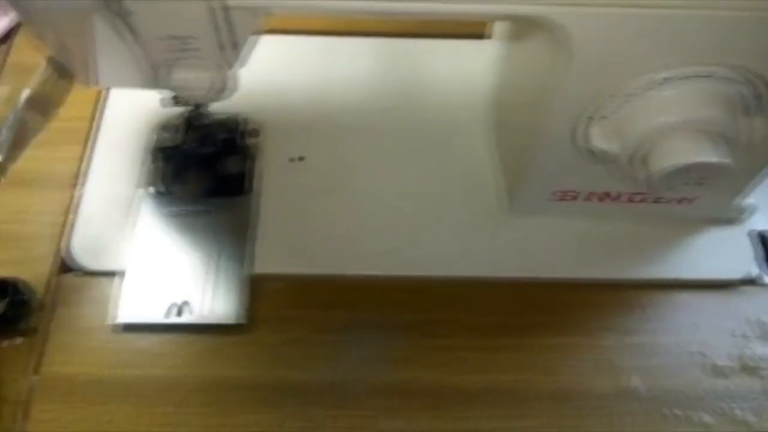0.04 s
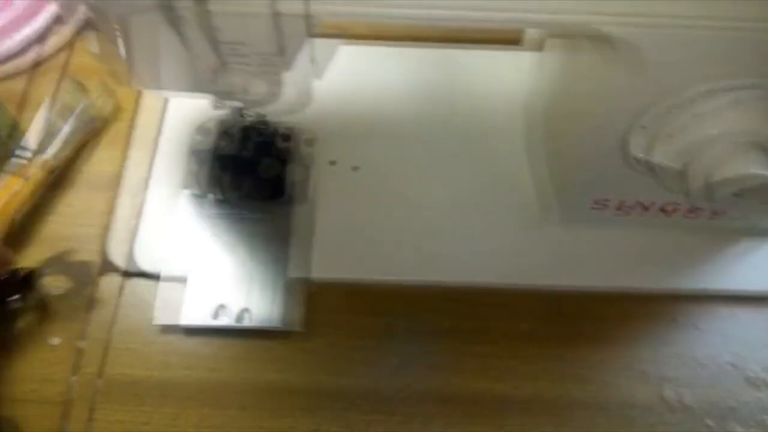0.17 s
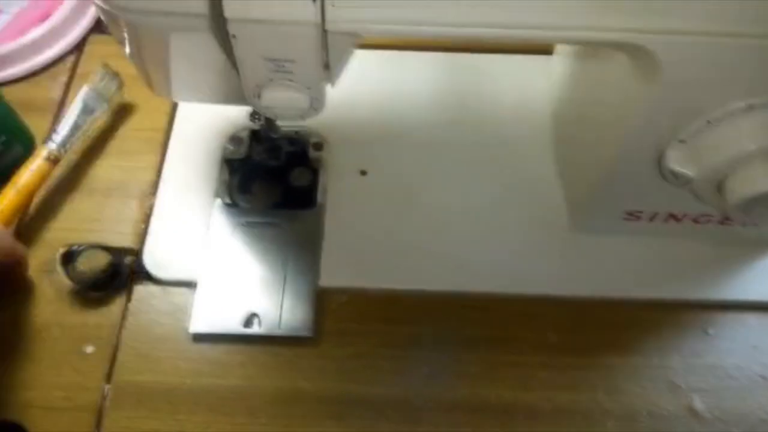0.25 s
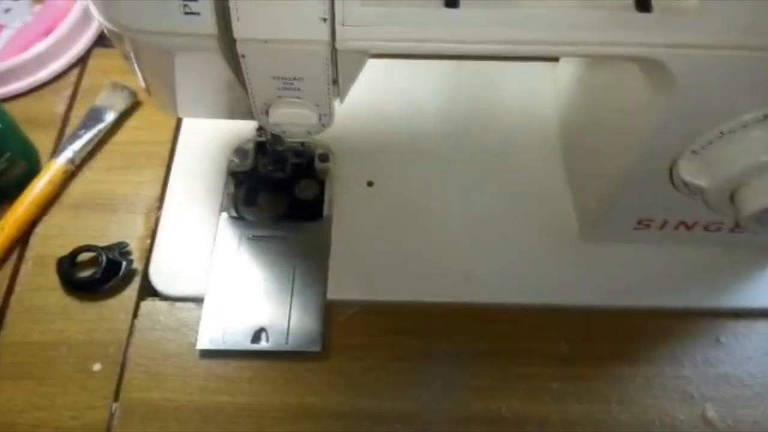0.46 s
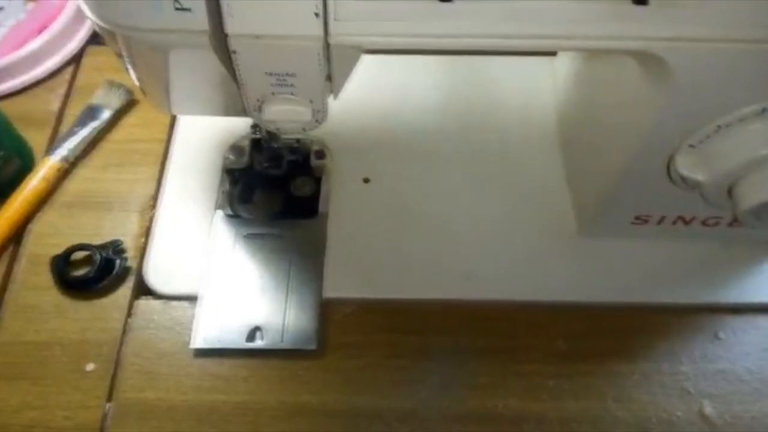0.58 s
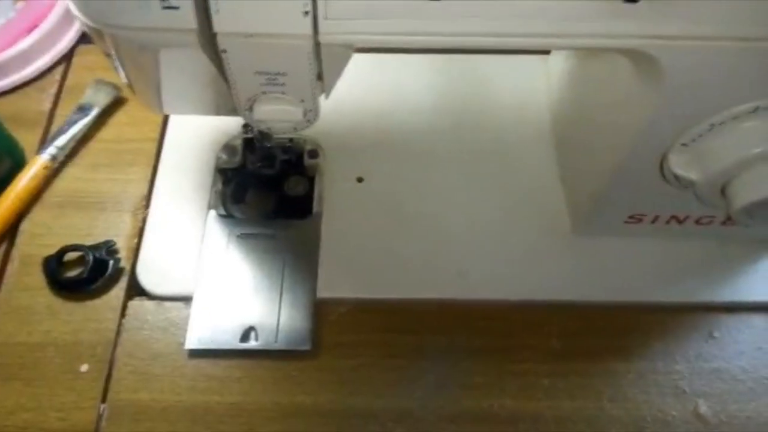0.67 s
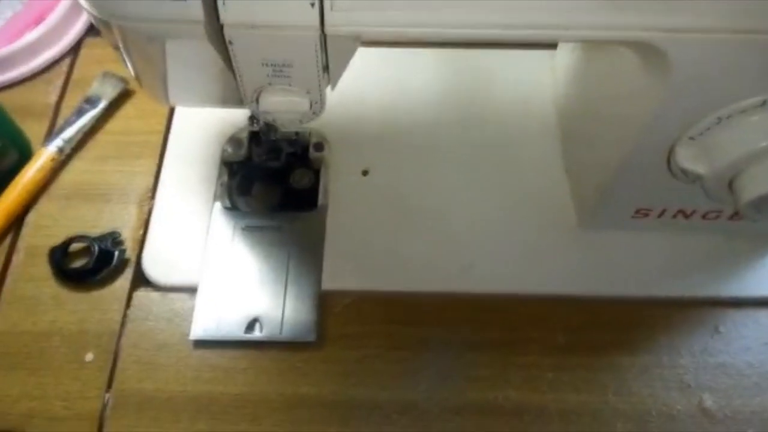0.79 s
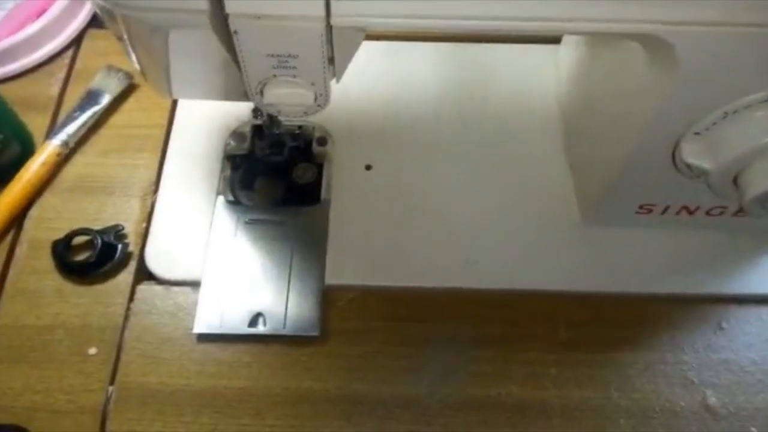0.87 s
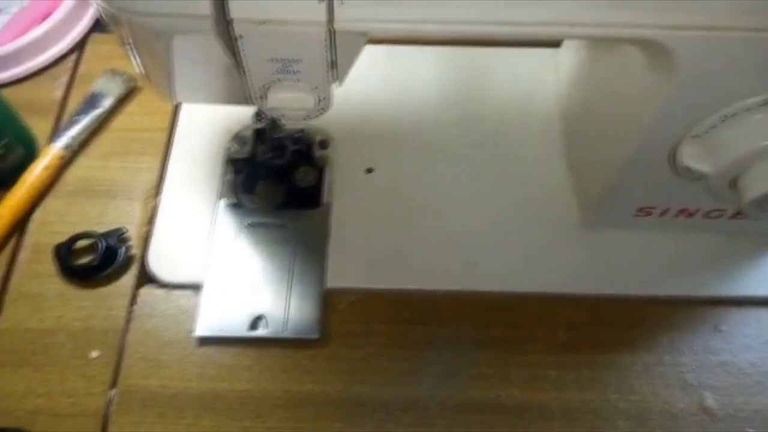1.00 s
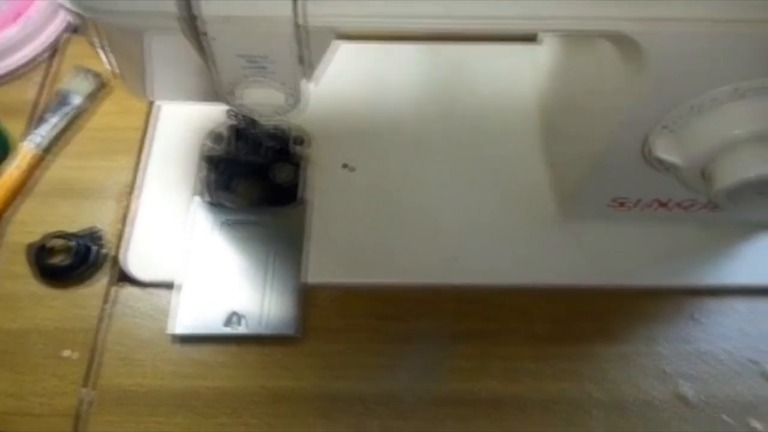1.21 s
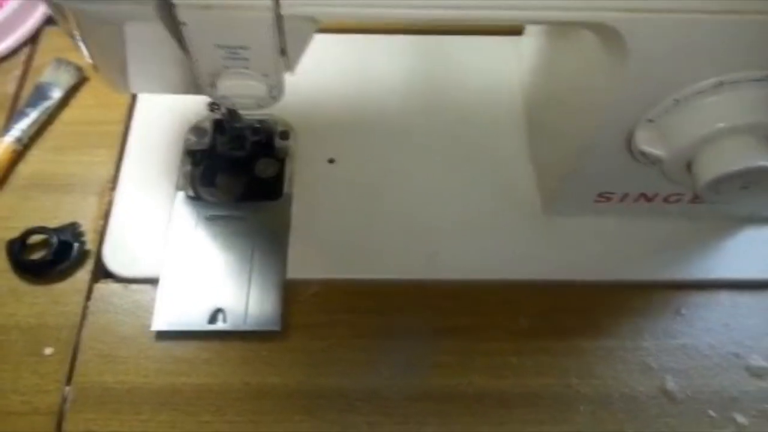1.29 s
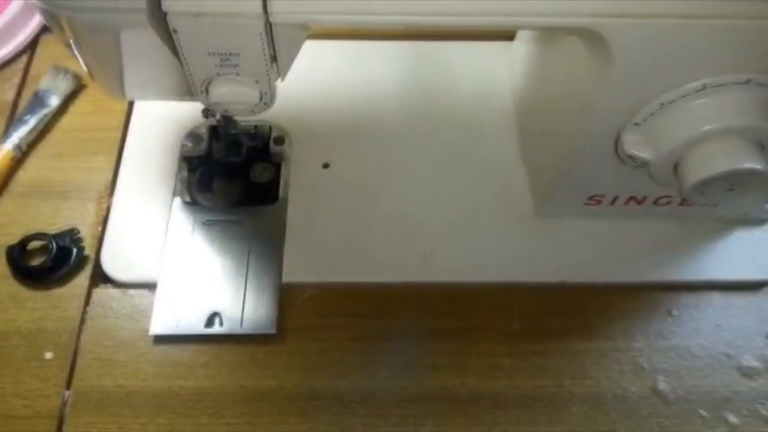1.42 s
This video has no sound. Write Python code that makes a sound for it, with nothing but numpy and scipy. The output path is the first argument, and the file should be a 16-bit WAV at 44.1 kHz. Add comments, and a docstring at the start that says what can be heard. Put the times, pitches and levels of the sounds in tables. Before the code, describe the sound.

A small wooden brush knocks once against a metal sewing machine, then its metal band clicks and scrapes briefly across it. After a pause, a small loose part rattles lightly to rest in a bare, slightly ringing room.

```python
"""A small wooden brush strikes a metal sewing machine: its handle knocks once, then its ferrule clicks
against the metal and scrapes briefly across it. Impacts and stick-slip friction excite the resonances
of brush and machine; damped modes of the table add soft thumps. Then a small loose part rattles to rest.
A bare, ringing room prolongs the contacts as a diffuse field; faint room noise lies underneath."""
import sys
import numpy as np
from scipy import signal
from scipy.fft import rfft, irfft, next_fast_len
from scipy.io import wavfile

SR = 44100
rng = np.random.default_rng(int(sys.argv[2]) if len(sys.argv) > 2 else 0)


def materialize(psi):
    """Save the field psi as 16-bit PCM at rate SR to the path in sys.argv[1].

    A 1-D psi becomes a single channel; in a 2-D psi each row is a channel.
    """
    bounded = np.clip(np.atleast_2d(psi).T, -1, 1)
    quanta = np.round(bounded * 32767).astype(np.int16)
    wavfile.write(sys.argv[1], SR, quanta)


N = 63945
T = np.arange(N) / SR

# spectrum of the bright metal shell: f/Hz, relative level/dB
SHELL_SPECTRUM = [(500, -37), (1450, -17), (1750, -3), (2050, -3), (2350, -10.5), (2800, -6), (3600, -4),
                  (4300, 4.5), (4870, 1), (5500, 6), (6050, 3.5), (6600, -10), (7300, -19.5), (8500, -37.5),
                  (11000, -33), (13500, -50)]
# narrow resonances of the metal, and its highest ping: f/Hz, bandwidth/Hz, level/dB
METAL_RESONANCES = [(4830, 200, -10.5), (5310, 430, 2), (5770, 200, -7), (5995, 280, -4),
                    (6690, 420, -16.5)]
PING_RESONANCE = [(15000, 520, 0.00078)]
# left-right coherence of the direct and of the diffuse field: f/Hz, correlation
DIRECT_COHERENCE = [(100, -0.055), (700, 0.85), (1200, -.2), (2500, -.1), (5000, -0.15), (15000, 0.34)]
DIFFUSE_COHERENCE = [(60, 0.98), (300, .8), (700, .6), (1100, -.25), (2200, 0.11), (5000, -0.65),
                     (15000, -0.18)]


def from_db(db):
    """Amplitude ratio: a factor of ten for every 20 dB."""
    return 10 ** (np.asarray(db) / 20)


def rms_one(x):
    """Normalisation to unit mean power."""
    return x / np.sqrt(np.mean(x ** 2) + 1e-20)


def at_hz(points, hz):
    """Linear interpolation on a logarithmic frequency axis."""
    f, value = np.transpose(points)
    return np.interp(np.log(np.maximum(hz, 1)), np.log(f), value)


def envelope(curve):
    """Piecewise exponential gain through points of t/s, level/dB."""
    return from_db(np.interp(T, *np.transpose(curve)))


def colour(x, spectrum):
    """Minimum-phase filtering to a given spectrum; white noise keeps its power."""
    size = 2 * next_fast_len(N)
    magnitude = rms_one(from_db(at_hz(spectrum, np.fft.rfftfreq(size, 1 / SR))))
    cepstrum = irfft(np.log(magnitude))
    cepstrum[1:size // 2] *= 2   # folding the cepstrum makes the filter causal
    cepstrum[size // 2 + 1:] = 0
    return irfft(rfft(x, size) * np.exp(rfft(cepstrum)))[..., :N]


def resonate(x, resonances):
    """Parallel band-pass resonators; each passes white noise at its own level, whatever its bandwidth."""
    out = 0
    for hz, width_hz, db in resonances:
        sos = signal.butter(2, [hz - width_hz / 2, hz + width_hz / 2], "band", fs=SR, output="sos")
        out = out + from_db(db) * np.sqrt(SR / 2 / width_hz) * signal.sosfilt(sos, x + 1e-18)
    return out


def spread(pair, coherence):
    """Partial coherence: two independent signals, weighted as mid and side, give left and right."""
    alike = np.clip(at_hz(coherence, np.fft.rfftfreq(N, 1 / SR)), -.98, .98)
    mid, side = irfft(rfft(pair) * np.sqrt([(1 + alike) / 2, (1 - alike) / 2]), N)
    return np.array([mid + side, mid - side])


def diffuse_noise():
    """White noise with the coherence of the diffuse field."""
    return spread(rng.choice([-1., 1.], (2, N)), DIFFUSE_COHERENCE)


def even_noise(coherence=DIRECT_COHERENCE, size=192):
    """Short-time whitening: stereo noise in which every frame holds all frequencies."""
    x = rng.standard_normal((2, N))
    for _ in range(6):
        frames = signal.stft(x, nperseg=size)[2]
        x = signal.istft(frames / (np.abs(frames) + 1e-12), nperseg=size)[1][:, :N]
    return spread(rms_one(x), coherence)


def contact(peak_s, db, rise_s, t60):
    """Impact envelope: exponential growth to a peak, then free decay by 60 dB in t60 seconds."""
    growth = np.minimum(T - peak_s, 0) / max(rise_s, 1e-4)
    decay = np.log(1000) * np.maximum(T - peak_s, 0) / t60
    return from_db(db) * np.exp(growth - decay)


def background():
    """Incoherent addition of room noise, a thin hiss and one faint rub on the table."""
    floor_spectrum = [(25, -21.5), (48, -10), (70, -24.5), (130, -17.5), (190, -15.5), (240, -6), (400, -8),
                      (750, -4), (1400, -1), (2000, -12), (3100, -14), (4300, -19), (5100, -14),
                      (5700, -10.5), (7000, -17), (8300, -28), (11000, -20), (13800, -29.5), (15300, -16.5),
                      (16000, -30)]   # room noise: f/Hz, relative level/dB
    hiss_levels = [(0, -76), (0.2, -94), (0.9, -83.5), (1.45, -71)]   # course of the hiss: t/s, level/dB
    # bands of the hiss and of the rub: f/Hz, bandwidth/Hz, level/dB
    hiss_band = [(5750, 650, 0)]
    rub_bands = [(722, 110, -2), (1300, 1770, 0), (4130, 1800, -2)]
    rub_peak_s, rub_sigma_s = .97, 0.052
    rub_swell = from_db(-68.5) * np.exp(-((T - rub_peak_s) / rub_sigma_s) ** 2 / 2)
    rub = rub_swell * resonate(diffuse_noise(), rub_bands)
    hiss = envelope(hiss_levels) * resonate(diffuse_noise(), hiss_band)
    return from_db(-67.5) * colour(diffuse_noise(), floor_spectrum) + hiss + rub


def reverberation(x, t60_scale=1):
    """Convolution with a diffuse tail that builds quickly and dies sooner in the treble."""
    decay_times = [(150, 0.64), (600, 0.4), (1200, 0.39), (2200, 0.4618), (5500, 0.4228), (9000, 0.09),
                   (15000, 0.1)]   # the room's decay: f/Hz, T60/s at t60_scale = 1
    tail_spectrum = [(50, -12), (150, -1.5), (300, 1), (700, -2), (2000, -4.5), (5500, -8), (9000, -6.5),
                     (15000, -15)]   # gain of the tail: f/Hz, level/dB
    edges_hz, build_s = np.geomspace(35, 18000, 16), 0.002
    white = [even_noise(DIFFUSE_COHERENCE, size=1024) for _ in range(2)]
    tail = 0
    for k, (low, high) in enumerate(zip(edges_hz, edges_hz[1:])):
        hz = np.sqrt(low * high)
        t60 = t60_scale * at_hz(decay_times, hz)
        fade = (1 - np.exp(-T / build_s)) * np.exp(-np.log(1000) * T / t60)
        band = signal.sosfilt(signal.butter(2, [low, high], "band", fs=SR, output="sos"), white[k % 2])
        tail = tail + from_db(at_hz(tail_spectrum, hz)) * band * fade / np.linalg.norm(fade)
    return signal.fftconvolve(x, tail, axes=1)[:, :N]


def table_thumps():
    """Free vibration of one heavily damped low mode of the table as things are handled."""
    bumps = [(0.244, -62.5), (0.489, -58), (0.51, -65.5), (0.575, -64), (0.625, -64)]   # soft impacts: t/s, level/dB
    mode_hz = 46
    return sum(contact(s, db, rise_s=.002, t60=0.092) * np.sin(2 * np.pi * mode_hz * (T - s))
               for s, db in bumps)


def loose_part_rattle():
    """Dissipation in repeated impacts: a light part rocks to rest in uneven, weakening ticks."""
    ticks = [(1.1398, -46), (1.1425, -40.5), (1.1485, -45), (1.152, -27.5), (1.16, -43), (1.1632, -38),
             (1.1707, -25.5), (1.184, -42), (1.1980, -29.5), (1.2045, -40), (1.2140, -33.5), (1.231, -34.5),
             (1.2482, -37.5), (1.257, -41.5), (1.2655, -41), (1.276, -48), (1.281, -49.5), (1.293, -52.5)]   # impacts: t/s, level/dB
    tick_spectrum = [(150, -46), (400, -32.5), (680, -22), (950, -25.5), (1850, -21), (2120, -5),
                     (2750, -6.5), (3200, -11), (3900, -2.5), (4500, -3.5), (5350, 0.5), (6200, -9.5),
                     (7000, -20), (7700, -69.5)]   # broadband sound of a tick: f/Hz, relative level/dB
    part_modes = [(1668, 40, -23), (2432, 67, -19), (3893, 113, -11), (5500, 119, -11.5)]   # the part's own modes: f/Hz, bandwidth/Hz, level/dB
    drive = sum(contact(s, db, rise_s=0.00087, t60=0.021) for s, db in ticks)
    return colour(drive * even_noise(), tick_spectrum) + resonate(drive * even_noise(), part_modes)


def handle_knock():
    """Impact excitation: the wooden handle gives a hollow knock, a bright crack and ringing modes."""
    impacts = [(0.227, -54.5, 0.0013, 0.11, -10), (0.2480, -24.5, .0007, 0.021, 5.5),
               (0.2521, -28.5, 0.0021, 0.027, -6)]   # contacts within the knock: t/s, level/dB, rise/s, T60/s, crack share/dB
    # spectra of the hollow knock and of the crack: f/Hz, relative level/dB
    knock_spectrum = [(120, -40.5), (300, -21.5), (540, -19.5), (690, 2.5), (880, -11.5), (1150, -3),
                      (1400, -3.5), (1570, -4.5), (2020, 3.5), (2300, -11), (2600, 1), (2950, -10),
                      (3300, -4), (4000, -11), (8500, -50)]
    crack_spectrum = [(600, -37.5), (2000, -15), (3600, -5), (4030, -8.5), (4500, 0), (5000, -4.5),
                      (5550, 4), (6600, -13.5), (7400, -19.5), (9800, -52.5), (11200, -30.5), (13200, -52)]
    modes = [(684, -12.5, 0.11), (1163, -18.5, 0.13), (2015, -13.5, 0.25), (2100, -9.5, 0.39),
             (2504, -13.5, 0.1), (3120, -15.5, .12), (3530, -17.5, .1), (3790, -16, .1), (4780, -12, 0.081),
             (5310, -12, 0.12), (5700, -10, .08)]   # modes that ring on: f/Hz, relative level/dB, T60/s
    drives = np.array([contact(*row[:4]) for row in impacts])
    crack = from_db(np.array(impacts)[:, 4]) @ drives * even_noise()
    ring = 0
    for s, db, *_ in impacts:
        for hz, mode_db, t60 in modes:
            phase = 2 * np.pi * (hz * T + rng.random())
            channel_shift = hz / 2000 * rng.normal(0, 1, (2, 1))
            ring = ring + contact(s, db + mode_db, rise_s=0.003, t60=t60) * np.sin(phase + channel_shift)
    knock = colour(drives.sum(0) * even_noise(), knock_spectrum)
    ping = from_db(-19.5) * resonate(crack, PING_RESONANCE)
    return knock + colour(crack, crack_spectrum) + from_db(-10) * ring + ping


def machine_body(x):
    """Forced response of the casting: a broad low spectrum plus lightly damped modes."""
    body_spectrum = [(90, -30.5), (190, -27.5), (320, -18.5), (500, -8.5), (670, -4), (770, -0.5), (870, 1),
                     (980, -1.5), (1200, 1.5), (1600, -3), (2300, 2), (3500, -1.5), (8000, -45.5)]   # broad response: f/Hz, relative level/dB
    body_modes = [(345, 40, -27), (665, 45, -19), (871.4, 20, -20), (1145, 48, -18.5), (1470, 90, -20.5),
                  (2055, 38, -14), (2127, 19, -15.5)]   # long modes: f/Hz, bandwidth/Hz, level/dB
    return colour(x, body_spectrum) + resonate(x, body_modes)


def ferrule_scrape():
    """Stick-slip friction: dense, uneven slips excite the shell, the body and the metal's resonances."""
    pressure = [(0.49, -62), (0.525, -29), (0.539, -30), (0.561, -22.5), (0.572, -31.5), (0.60, -31.5),
                (0.628, -33), (0.65, -52), (0.68, -73)]   # pressure of the stroke: t/s, level/dB
    slips_per_s, slip_spread_db, body_growth_db_per_s = 1800, 1.5, 51
    sizes = from_db(slip_spread_db * np.minimum(rng.exponential(1, N), 4))
    slips = sizes * (rng.random(N) < slips_per_s / SR)
    trains = [spread(slips * rng.choice([-1, 1], (2, N)), DIRECT_COHERENCE) for _ in range(3)]
    shell, body, ring = (envelope(pressure) * rms_one(train) for train in trains)
    start, end = pressure[0][0], pressure[-1][0]
    # the body's share grows along the stroke, so the sound dulls
    body_db = -7.5 + body_growth_db_per_s * (np.clip(T, start, end) - (start + end) / 2)
    return (colour(shell, SHELL_SPECTRUM) + machine_body(body * from_db(body_db))
            + from_db(-19.5) * resonate(ring, METAL_RESONANCES))


def ferrule_clicks():
    """Impact excitation of metal: each click drives shell, body and resonances in its own proportions."""
    # ferrule on metal: t/s, level/dB, rise/s, T60/s, then share/dB of body, hollow, bright ring, ping
    impacts = [(0.4059, -40, .0005, .05, 2, 1.5, -20, -39.5),
               (0.4183, -45.5, .002, .05, 9.5, 0, -31.5, -44.5),
               (0.437, -33.5, 0.0014, 0.028, 7.5, 0.5, 7.5, 2),
               (0.4545, -35.5, 0.0013, 0.027, 6.5, 4.5, -24, -32),
               (0.4698, -25, .0005, 0.022, -1, -3, -23.5, -34),
               (0.4929, -12.5, .0013, .013, -12, -9.5, 2.5, -19.5),
               (0.5160, -13.5, .0006, .022, -5, -8, -16.5, -28),
               (0.5224, -11.5, .0006, .024, -12, -21.5, -10.5, -29.5),
               (0.5799, -21.5, 0.0028, 0.015, -2.5, -15, -5, -31),
               (0.5928, -17.5, 0.0011, 0.032, 2.5, -22, -20, -51),
               (0.6061, -26, 0.00065, 0.021, -1.5, -9, -3, -27.5),
               (0.6221, -22, 0.00079, 0.029, 1, -9.5, -2, -50)]
    ferrule_modes = [(1280, 176, -7), (2582, 330, -1), (3450, 240, -6)]   # the ferrule's hollow ring: f/Hz, bandwidth/Hz, level/dB
    drives = np.array([contact(*row[:4]) for row in impacts])
    body, hollow, ring, ping = from_db(np.array(impacts)[:, 4:]).T @ drives
    chatter = even_noise()
    shell = colour(drives.sum(0) * even_noise(), SHELL_SPECTRUM)
    casting = from_db(-3.5) * machine_body(body * even_noise())
    return (shell + casting + resonate(hollow * chatter, ferrule_modes)
            + resonate(ring * chatter, METAL_RESONANCES) + resonate(ping * chatter, PING_RESONANCE))


def scene():
    """Superposition of direct sound, reverberant field and background."""
    wood = handle_knock()
    metal = ferrule_clicks() + ferrule_scrape()
    rattle = loose_part_rattle()
    brush_tail = reverberation(from_db(0.5) * wood + from_db(1) * metal)
    rattle_tail = from_db(1) * reverberation(rattle, t60_scale=0.78)
    return wood + metal + rattle + brush_tail + rattle_tail + table_thumps() + background()


def record(dry):
    """Band limiting: an elliptic low-pass cuts the top treble steeply."""
    cutoff_hz = 16400
    return signal.sosfilt(signal.ellip(10, .2, 70, cutoff_hz, fs=SR, output="sos"), dry)


dry = scene()
out = record(dry)
materialize(out)
```